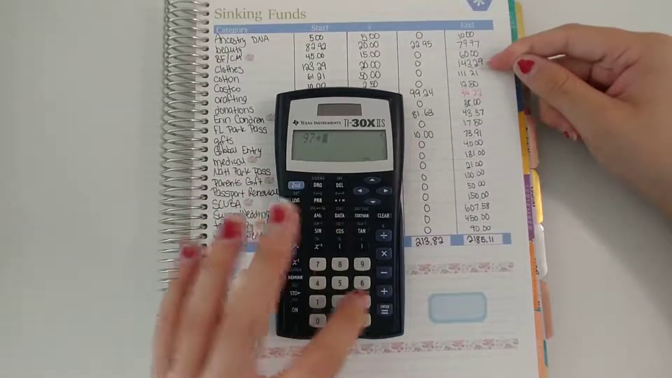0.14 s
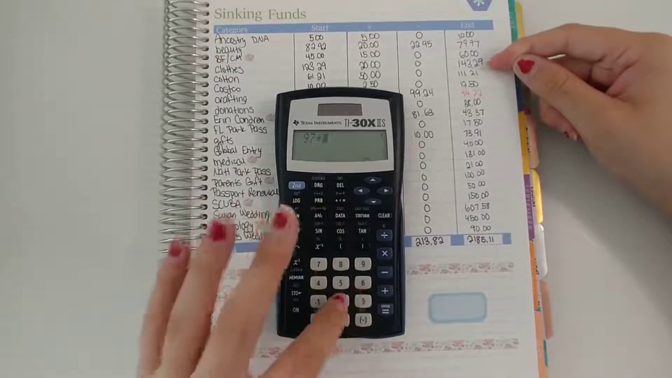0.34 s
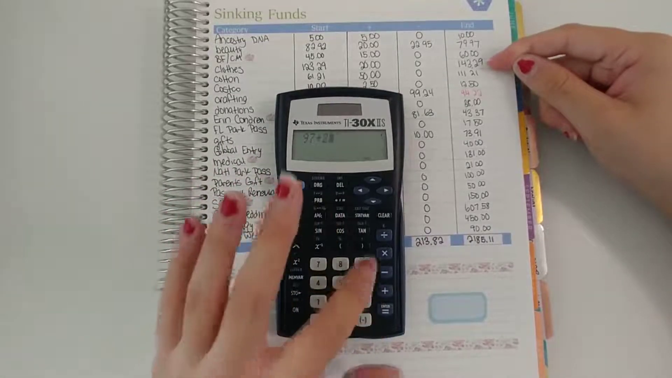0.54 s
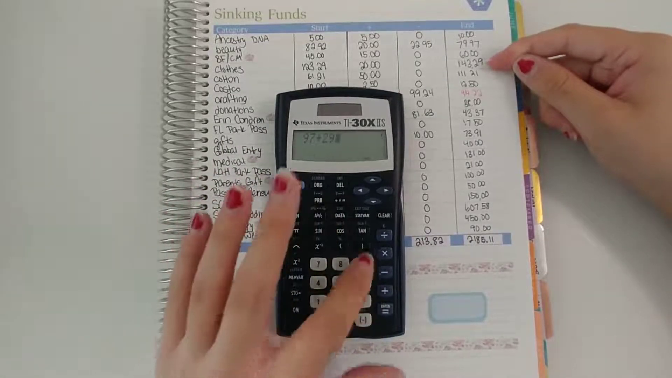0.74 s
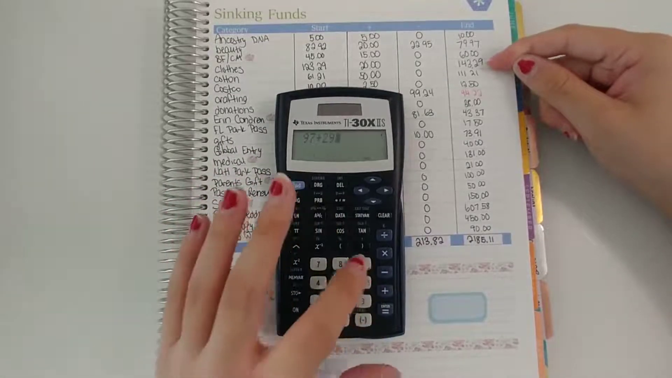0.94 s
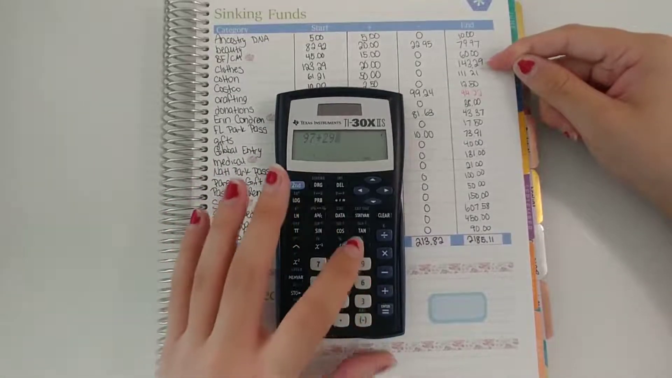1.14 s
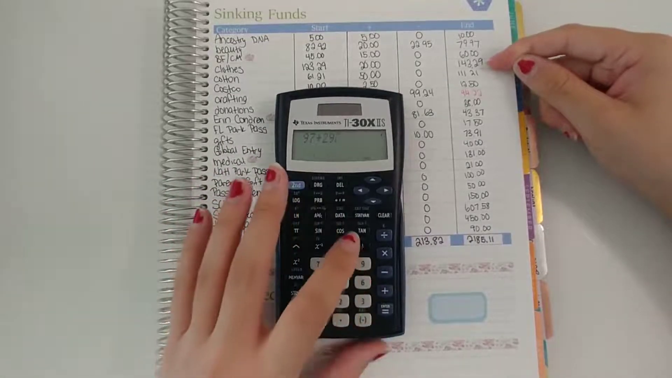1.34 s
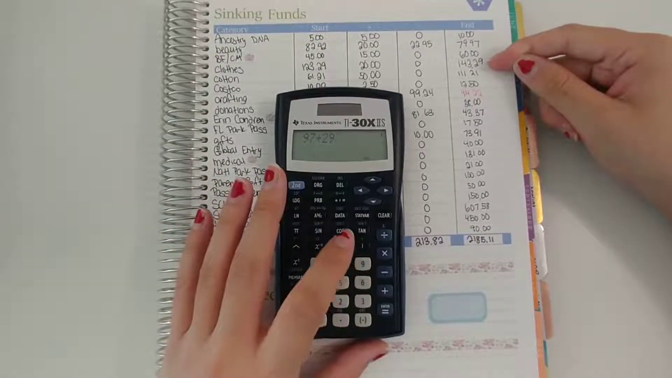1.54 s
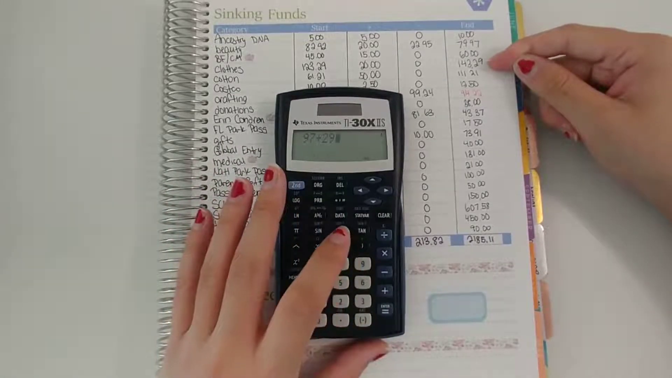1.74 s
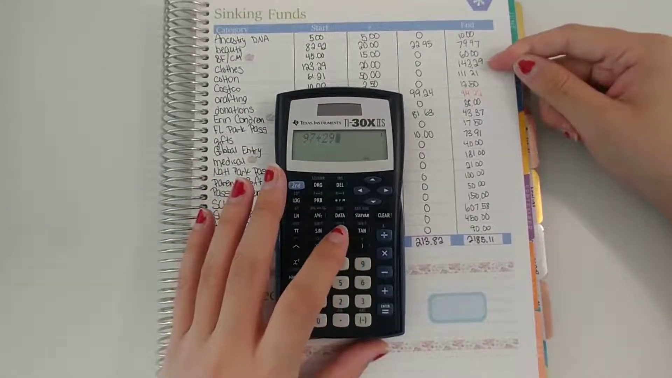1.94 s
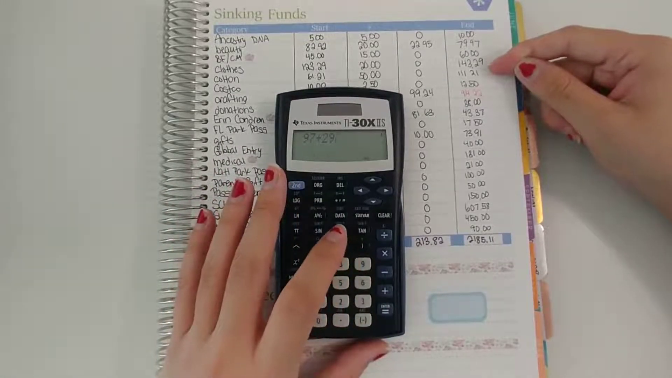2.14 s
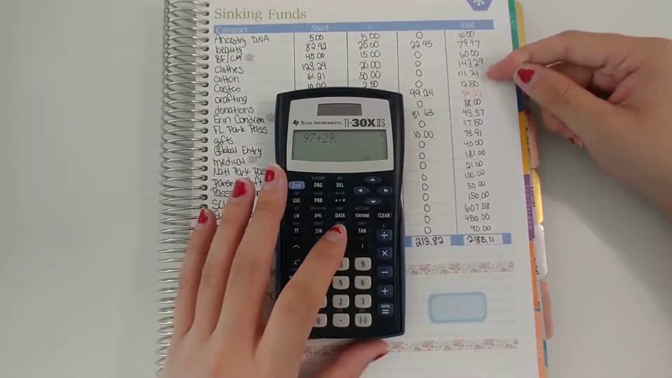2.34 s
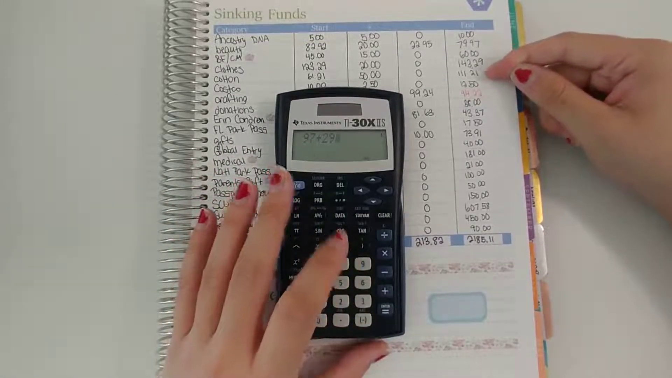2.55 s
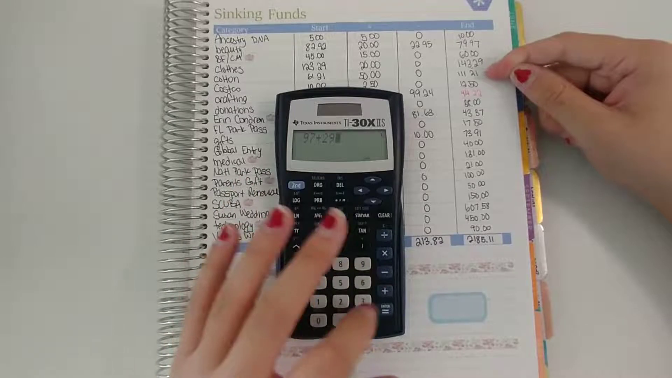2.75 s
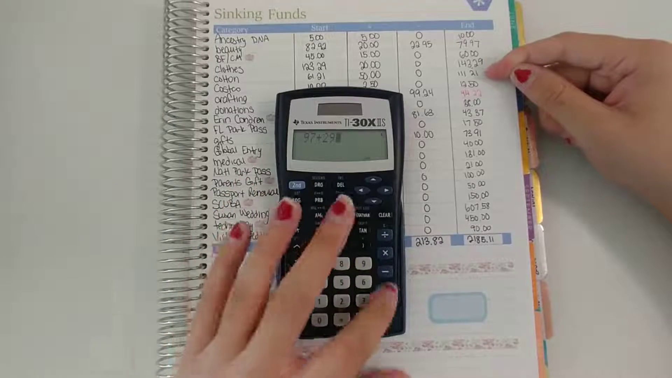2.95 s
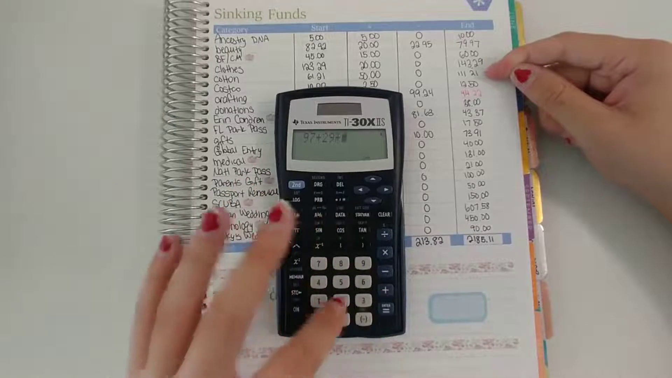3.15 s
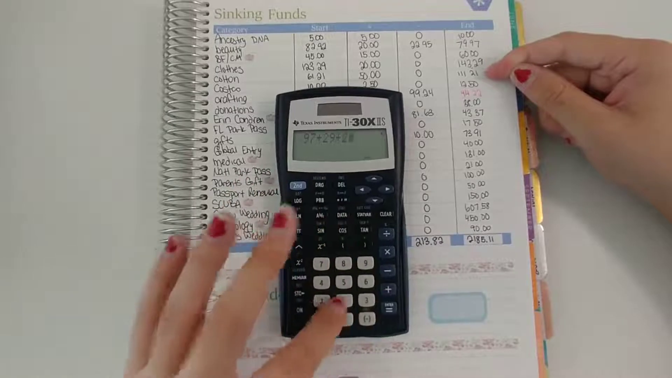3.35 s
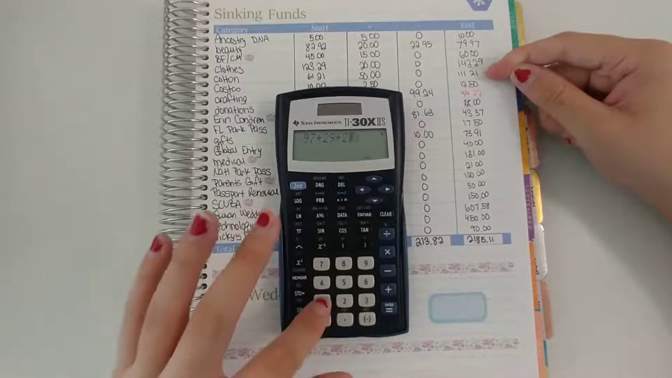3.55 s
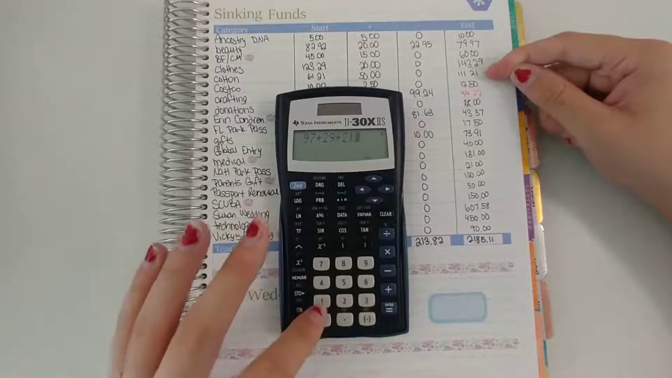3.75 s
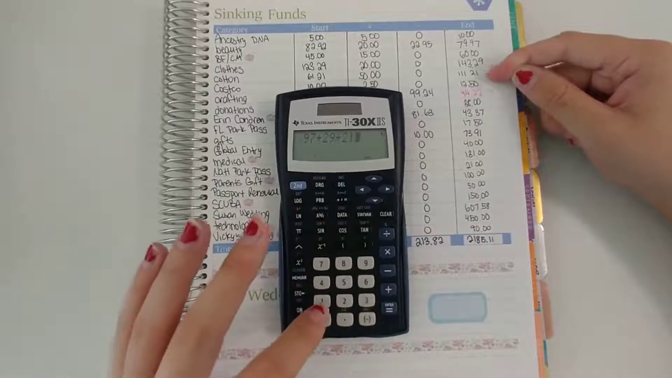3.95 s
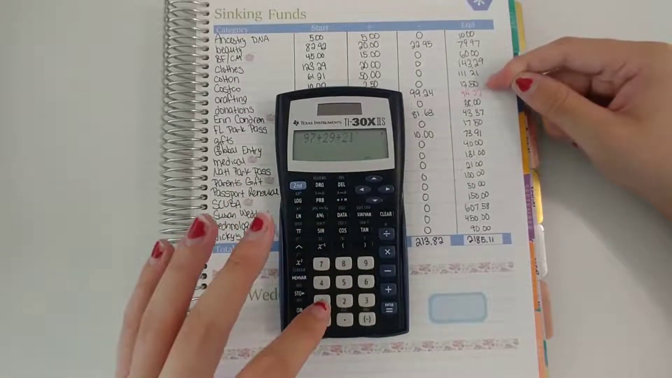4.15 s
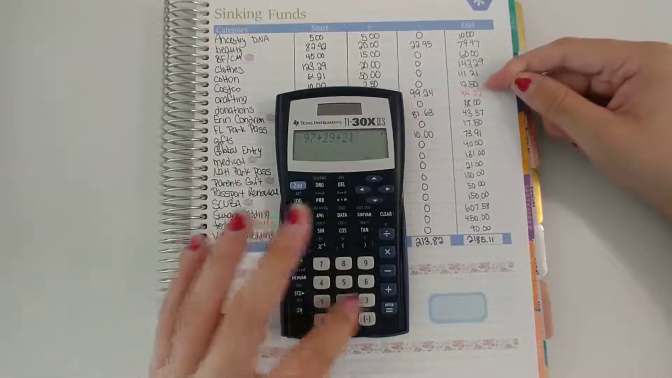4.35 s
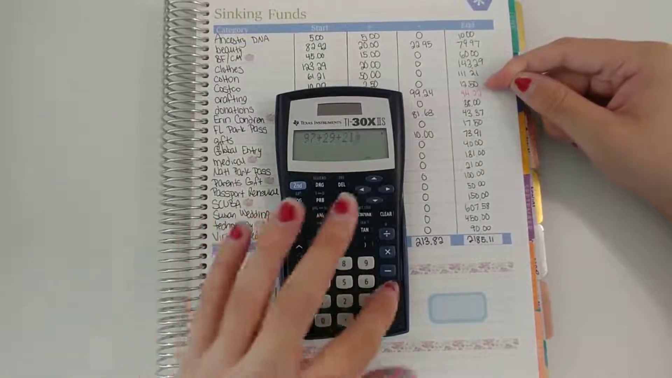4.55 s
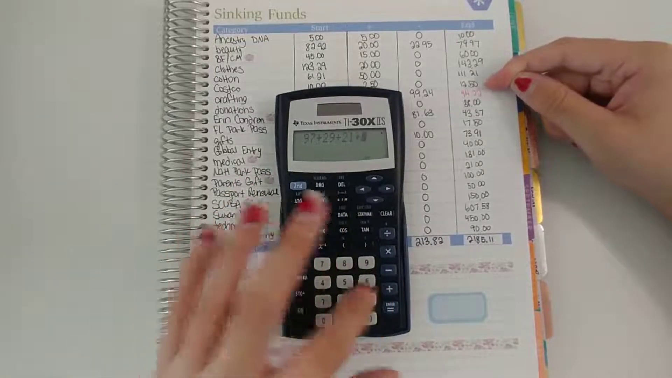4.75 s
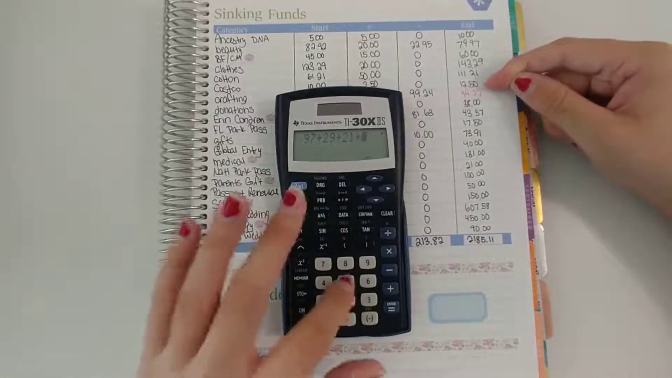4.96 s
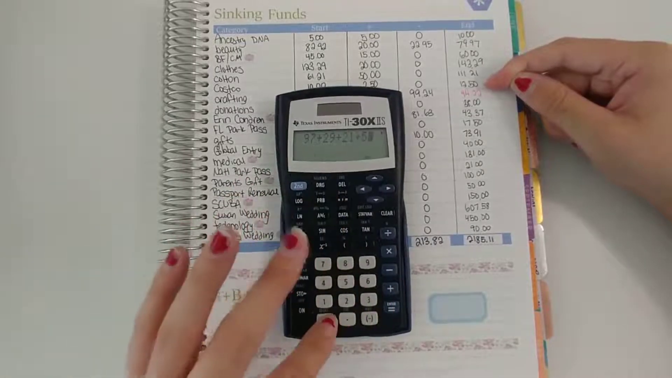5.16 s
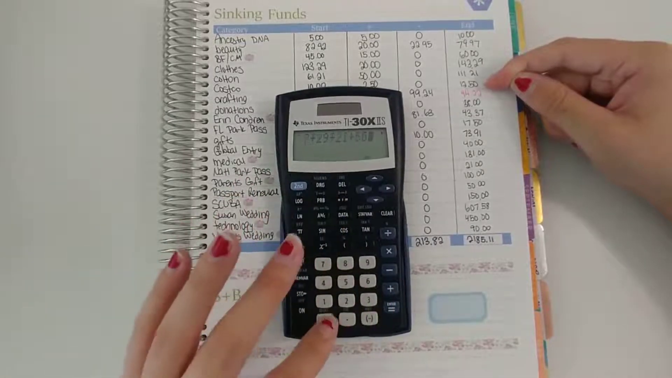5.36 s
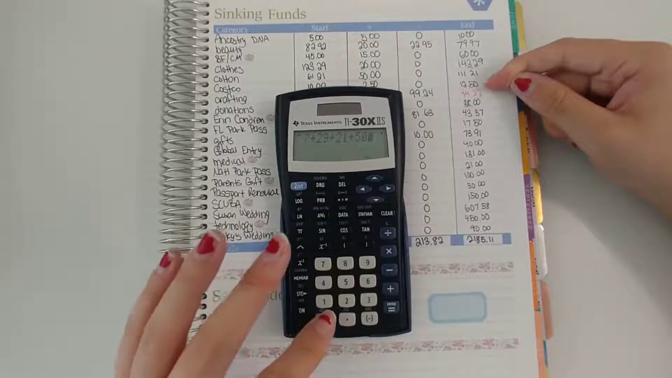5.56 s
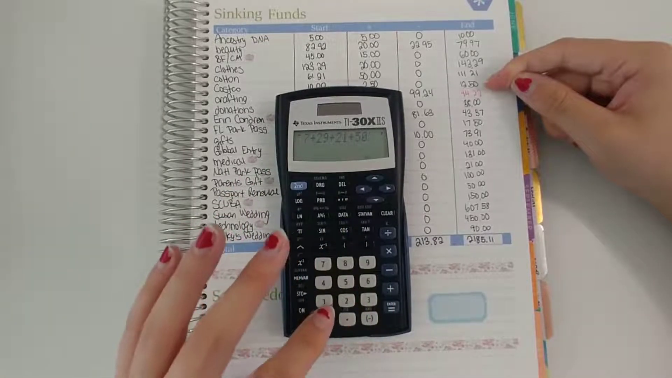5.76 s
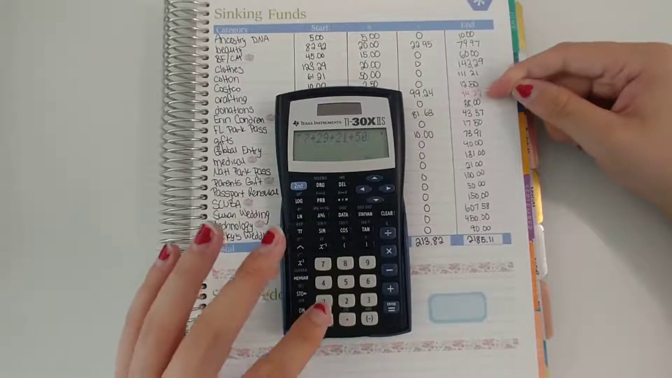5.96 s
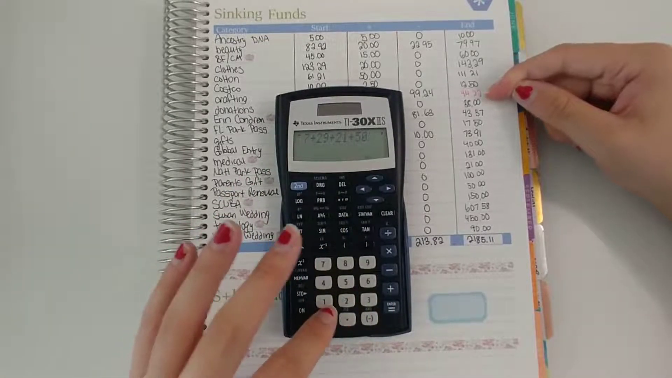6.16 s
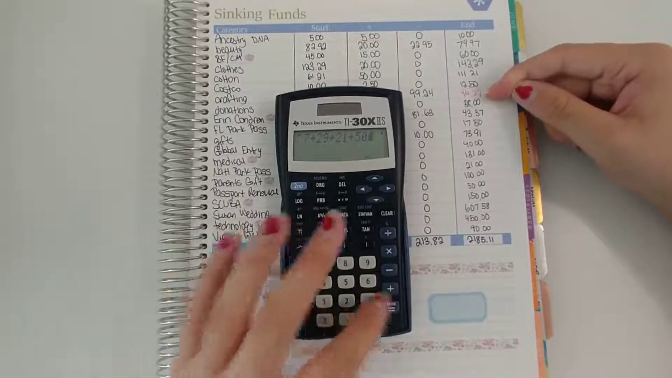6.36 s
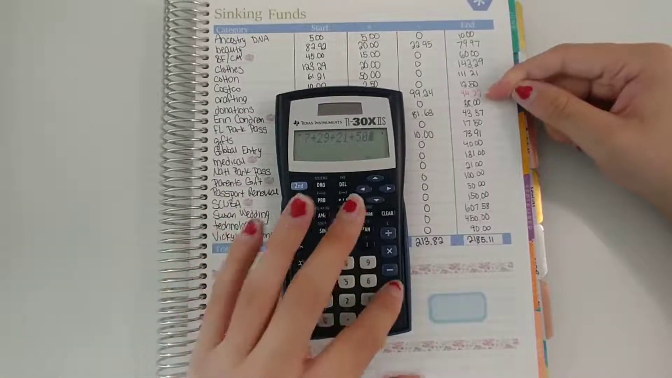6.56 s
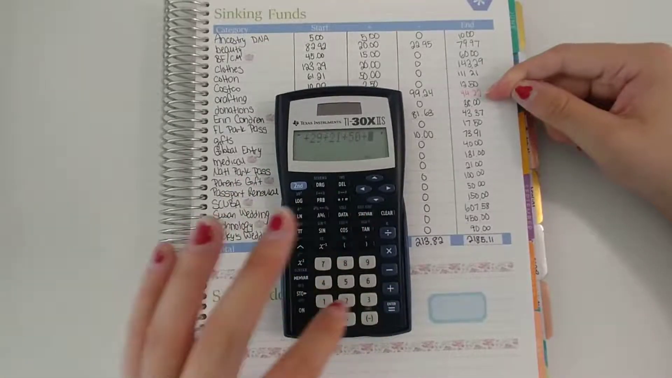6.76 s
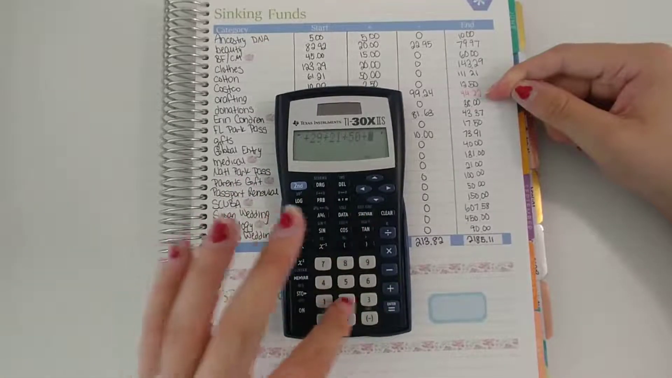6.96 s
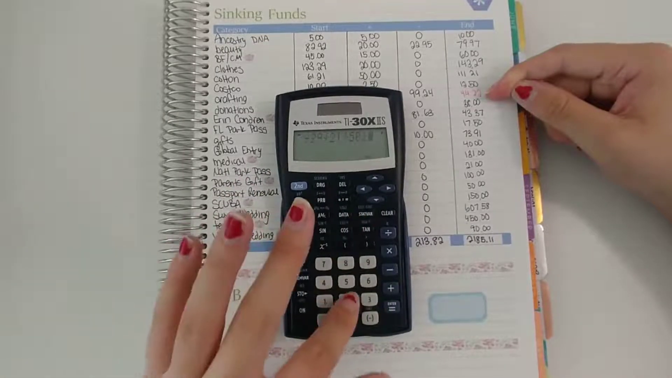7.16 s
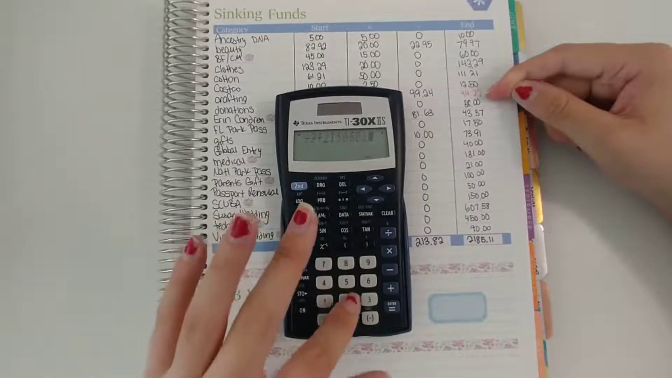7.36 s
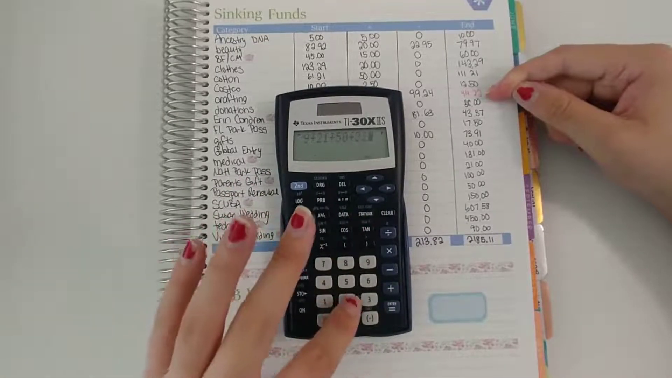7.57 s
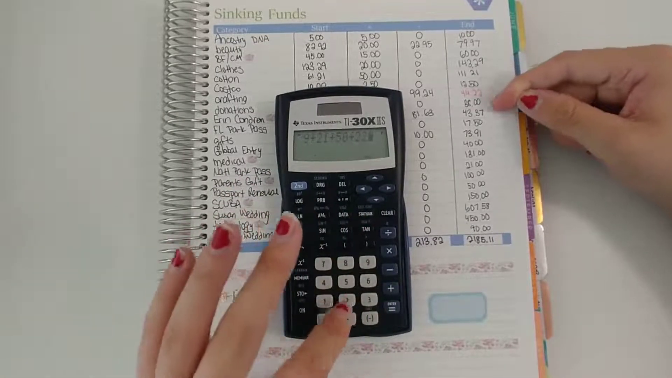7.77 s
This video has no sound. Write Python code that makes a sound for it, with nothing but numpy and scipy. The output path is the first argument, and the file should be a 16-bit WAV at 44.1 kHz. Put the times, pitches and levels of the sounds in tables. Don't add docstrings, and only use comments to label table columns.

```python
import sys
import numpy as np
from scipy import signal
from scipy.fft import rfft, irfft, next_fast_len
from scipy.io import wavfile
from scipy.ndimage import uniform_filter1d, map_coordinates

SR = 44100
rng = np.random.default_rng(int(sys.argv[2]) if len(sys.argv) > 2 else 0)


def volts(x):
    e = np.asarray(x, float) / 20
    return 10 ** e


def unload_wav(signal):
    wavfile.write(
        sys.argv[1],
        SR,
        np.round(np.clip(np.atleast_2d(signal).T, -1, 1) * 32767).astype(np.int16),
    )


N = 345303


def unit(x):
    return x / np.sqrt(np.mean(x ** 2) + 1e-20)


def along(points, hz):
    f, v = np.transpose(points)
    return np.interp(np.log(hz + 1), np.log(f + 1), v)


def wobble(rate_hz):
    knots = rng.standard_normal(int(N * rate_hz / SR) + 4)
    return map_coordinates(knots, [np.arange(N) * rate_hz / SR])


def swells(rows):
    t = np.arange(N) / SR
    total = 0
    for s, db, rise_s, fall_s in rows:
        decay = np.where(t < s, (s - t) / rise_s, (t - s) / fall_s)
        total = total + volts(db - 20 * decay)
    return total


def filtered(x, response):
    m = next_fast_len(N + SR // 2, real=True)
    return irfft(rfft(x, m) * response(np.fft.rfftfreq(m, 1 / SR)), m)[..., :N]


def causal(db):
    cepstrum = irfft(np.log(volts(db)))
    half = len(cepstrum) // 2
    folded = np.r_[cepstrum[0], 2 * cepstrum[1:half], np.zeros(len(cepstrum) - half)]
    return np.exp(rfft(folded))[:len(db)]


def modes(table):
    def response(f):
        total = 0
        for k, (c, w, db) in enumerate(table):
            total = total + (-1) ** k * volts(db) * 1j * f * w / (c * c - f * f + 1j * f * w)
        return total
    return response


def favoured(table, hz):
    lift_db, reach_hz = 6.5, 500
    return [(c, w, db + lift_db * np.exp(-((c - hz) / reach_hz) ** 2)) for c, w, db in table]


def rings(parts, gains_db):
    span = SR // 8
    half = span // 2
    hz = np.fft.rfftfreq(span, 1 / SR)
    ring = np.array([irfft(modes(part)(hz), span)[:half] for part in parts])
    return volts(gains_db)[:, None] * ring * np.hanning(span)[half:half * 2]


# freq_hz, correlation
ALIKE = [(60, 0.92), (240, 0.73), (950, 0.14), (3770, 0.022), (15000, -0.42)]
# freq_hz, lean_db
LEAN = [(60, 6.5), (240, 2), (950, 3.5), (3770, 4.5), (15000, 1.5)]


def rush(response, patchy_db):
    z = signal.stft(rng.standard_normal((2, N)), nperseg=512)[2]
    field = uniform_filter1d(rng.standard_normal(z.shape[1:]), 6, 0)
    field = uniform_filter1d(field, 10, 1)
    patchy = signal.istft(z * volts(patchy_db * unit(field)), nperseg=512)[1][:, :N]
    m = next_fast_len(N + SR // 2, real=True)
    hz = np.fft.rfftfreq(m, 1 / SR)
    a, b = rfft(patchy, m) * response(hz)
    turn = np.arccos(np.clip(along(ALIKE, hz), -1, 1)) / 2
    lean = volts(along(LEAN, hz) / 2)
    mid, side = a * np.cos(turn), b * np.sin(turn)
    return unit(irfft(np.array([(mid + side) * lean, (mid - side) / lean]), m)[:, :N])


# freq_hz, t60_s
ROOM = [(250, 0.37), (700, 0.42), (2000, 0.42), (5000, 0.31), (8000, 0.31), (12000, 0.18)]
# delay_s, level_db
WALLS = [(.005, -17), (.010, -19.5), (.013, -15), (.017, -24), (.022, -22.5), (0.03, -29.5)]


def answer(walls_db, tail_db):
    hz, t, z = signal.stft(rng.standard_normal((2, SR // 3)), SR, nperseg=256)
    alike = np.clip(along(ALIKE, hz), 0, 1)[:, None]
    z = np.array([z[0], alike * z[0] + np.sqrt(1 - alike ** 2) * z[1]])
    tail = signal.istft(z * volts(-60 * t / along(ROOM, hz)[:, None]), SR, nperseg=256)[1]
    t = np.arange(tail.shape[1]) / SR
    tail = volts(tail_db) * tail / np.linalg.norm(tail[0]) * (1 - np.exp(-t / 0.0015))
    early = 0
    for s, db in WALLS:
        early = early + volts(db + walls_db) * (t > s) * np.exp(-np.abs(t - s) / 0.0017) / 8
    return tail + early * rng.standard_normal(tail.shape)


def contacts(blows, shared, lean_db, strike, t60_s, lag_s, walls_db, tail_db):
    blur_s = 0.0083
    t = np.arange(SR // 50) / SR
    chatter = volts(-60 * t / t60_s) + 0.2 * volts(-60 * t / 0.049)
    shared = np.clip(shared, 0, 1)[:, None, None]
    facing = volts(np.outer(lean_db, [.5, -.5]))[..., None]
    out = np.zeros((2, N + SR))
    for s, ring, pan_db in blows:
        scrape = chatter * rng.standard_normal((2, len(t)))
        scrape[:, 0] = strike
        scrape = scrape / np.linalg.norm(scrape, axis=1, keepdims=True)
        drive = shared * scrape[0] + (1 - shared) * scrape
        direct = (signal.fftconvolve(ring[:, None], drive, axes=2) * facing).sum(axis=0)
        direct[0] = np.roll(direct[0], round(lag_s * SR))
        direct = direct * volts(np.array([[pan_db], [-pan_db]]) / 2)
        whole = ring.sum(axis=0)
        merged = whole * volts(-60 * np.arange(len(whole)) / SR / blur_s)
        merged = merged * np.linalg.norm(whole) / np.linalg.norm(merged)
        echo = signal.fftconvolve(merged[None], answer(walls_db, tail_db), axes=1)
        echo = echo * volts(np.array([[1.5], [-1.5]]))
        start = round((s + .0004) * SR)
        out[:, start:start + direct.shape[1]] += direct
        out[:, start:start + echo.shape[1]] += echo
    return out[:, :N]


# time_s, level_db
BUILDING = [(0.0, -61.5), (0.74, -62), (1.18, -65), (2.3, -61), (3.5, -61), (4.2, -62.5), (5.2, -59),
            (5.65, -63.5), (6.6, -58), (6.8, -61), (7.4, -58.5), (7.83, -57.5)]
# peak_s, level_db
SHAKES = [
    (2.44, -55),
    (2.79, -54),
    (2.97, -53),
]
# freq_hz, density_db
RUMBLE = [(15, -59), (25, -38.5), (40, -16), (65, -3), (124, -4), (144, -10), (172, -1.5), (199, -20),
          (400, -18.5), (520, -33), (880, -120)]
# freq_hz, density_db
HISS = [(120, -36.5), (200, -1), (284, -11), (617, -12), (1200, -20.5), (2210, -26.5), (2960, -26),
        (3560, -27), (4370, -29.5), (7460, -34), (10000, -37.5), (15000, -32.5), (16500, -43.5)]
# center_hz, width_hz, level_db
FAN = [(2220, 120, -1), (3640, 98, 1), (5770, 200, -12.5), (7540, 260, -12)]
# peak_s, level_db
WHISTLES = [
    (0.94, -70),
    (2.9, -67),
    (3.79, -71.5),
    (6.391, -77),
]


def air():
    building = volts(np.interp(np.arange(N) / SR, *np.transpose(BUILDING), -120, -120))
    shake = building + swells([(s, db, 0.057, 0.15) for s, db in SHAKES])
    rumble = shake * volts(0.7 * wobble(10.0)) * rush(lambda hz: volts(along(RUMBLE, hz)), patchy_db=0.5)
    follow = (shake / volts(-60.5)) ** 0.42
    murmur = follow * volts(-66.0) * rush(lambda hz: volts(along(HISS, hz)), patchy_db=0.5)
    fan = volts(-76.5 + 0.56 * wobble(9.7)) * rush(modes(FAN), patchy_db=3.5)
    whistle = volts(-87.5) + swells([(s, db, 0.27, 0.56) for s, db in WHISTLES])
    whistle = whistle * volts(-6.5) * rush(modes([(1564, 120, 0)]), patchy_db=1.5)
    return rumble + murmur + fan + whistle


# start_s, peak_db, pitch_hz
THUMPS = [(0.001, -47, 55.9), (0.322, -49.5, 66.6), (0.645, -45.5, 70), (0.739, -51, 99),
          (1.846, -56, 67.7), (2.41, -55.5, 76.1), (2.446, -44.5, 92.86), (2.742, -53, 74.6),
          (2.806, -57.5, 95.8), (2.946, -31.5, 72), (2.987, -46.5, 56), (3.295, -46.5, 67.7),
          (3.527, -48.5, 70.7), (3.654, -53.5, 71), (4.6016, -35.5, 79.5), (4.643, -44, 78),
          (4.9624, -37.5, 75.7), (5.164, -49, 83.23), (5.211, -47, 99), (5.255, -43.5, 75),
          (5.442, -48, 84.6), (6.536, -43, 96.5), (7.095, -47.5, 72.5), (7.214, -51, 68.8),
          (7.364, -48, 66.8)]


def thumps():
    out, t = np.zeros(N + SR), np.arange(SR // 3) / SR
    swell = (t / 0.0074) ** 2 * np.exp(-t / 0.0067)
    swell = swell + 0.14 * (1 - np.exp(-t / 0.022)) * volts(-60 * t / 0.098)
    neighbours = 0.28 * np.sin(2 * np.pi * 113 * t) + 0.22 * np.sin(2 * np.pi * 57 * t)
    for s, db, hz in THUMPS:
        ring = np.sin(2 * np.pi * hz * t) + neighbours
        out[round(s * SR):][:len(t)] -= volts(db + 5.5) * swell * ring
    return out[:N] * volts(np.array([[2.5], [-2.5]]))


# center_hz, width_hz, level_db
KEY = [(3264, 680, -8), (3700, 610, -3), (4326, 340, -3.5), (4680, 300, -2.5), (5130, 460, -4),
       (5720, 150, -0.5)]
CASE = [(925, 400, -14), (1540, 200, 2), (2210, 1450, -5.5), (2510, 133, 1.5)]
CAP = [(6190, 430, 4.8), (7200, 810, 4.7), (7430, 206, 8.5), (8090, 330, 3.4)]
SNAP = [(12700, 1500, 11), (13600, 350, 1), (15200, 480, 31)]
# start_s, peak_db, case_db, cap_db, mode_hz
DOWNS = [(0.0516, -50.5, -7, -9, 4770), (0.315, -33, -12, -5.5, 6780), (0.6348, -32, -27, -23, 5790),
         (3.271, -35, -18, -12.5, 3360), (3.4891, -60, 7, -13, 3070), (3.496, -50, 3, -9, 6540),
         (4.5978, -37, -10, -16.5, 4200), (4.9487, -36, -22, -29, 3260), (5.1984, -35.5, -12.5, -9.5, 5580),
         (6.5319, -39.5, -14, -9, 7600), (7.436, -38.5, -11.5, -14.5, 3850)]
# start_s, peak_db, case_db, cap_db, snap_db
UPS = [
    (0.407, -33.5, -11, -3.5, -33),
    (0.7303, -23.5, -16.5, -12, -18.5),
    (3.3695, -31.5, -11.5, -9, -32),
    (3.6403, -37.5, -10.5, -7, -27.5),
    (4.686, -32, -22, -9.5, -28),
    (5.036, -35.5, -13, -17, -26),
    (5.3413, -25, -19.5, -9, -34),
    (6.615, -26, -22, -8.5, -31),
    (7.2038, -29, -11.5, -7.5, -26),
]
UP_MODES_HZ = [3700, 4880, 6520, 3750, 5940, 4770, 5600, 4900, 7590]
# start_s, peak_db, case_db, mode_hz
BOUNCES = [(0.6401, -37.5, -8.5, 5830), (0.6488, -35.5, -10, 4300), (0.7377, -30, -10, 3700),
           (3.3825, -42, -38, 6167), (3.644, -37.5, -13.5, 4300), (4.694, -33.5, -17.5, 5820),
           (4.9573, -46.5, -5, 3520), (5.3602, -44, -19, 5555), (6.537, -43, -3, 6030),
           (6.6224, -34.5, -9.5, 4730), (7.2167, -46, -12, 5760)]
# start_s, peak_db
TICKS = [(0.0699, -63), (0.3294, -54), (0.4195, -56), (0.6288, -52), (2.034, -59.5), (4.5823, -52),
         (4.704, -50), (5.181, -48.5), (5.194, -52), (6.604, -51), (7.068, -58), (7.3251, -55.5),
         (7.3294, -53.5)]


def keys():
    # start_s, peak_db, case_db, cap_db, snap_db, mode_hz
    rows = [(s, db, case_db, cap_db, -30, hz) for s, db, case_db, cap_db, hz in DOWNS]
    rows += [(*row, hz) for row, hz in zip(UPS, UP_MODES_HZ)]
    rows += [(s, db, case_db, -10.5, -24.5, hz) for s, db, case_db, hz in BOUNCES]
    rows += [(s, db, -6.5, -10, -26, 3700) for s, db in TICKS]
    blows = []
    for s, db, case_db, cap_db, snap_db, hz in sorted(rows):
        parts = (favoured(KEY, hz), CASE, favoured(CAP, hz), SNAP)
        gains_db = db + np.array([14, case_db + 25.5, cap_db + 15.5, snap_db + 4.5])
        blows.append((s, rings(parts, gains_db), 7.5))
    return contacts(blows, shared=(0.15, 0.21, 0.29, .1), lean_db=(3.7, -3.5, 2.5, -1.2),
                    strike=13, t60_s=0.018, lag_s=.00012, walls_db=5.5, tail_db=-14)


# peak_s, level_db, rise_s, fall_s
SHIFTS = [(0.8, -86, .01, 3.6), (1.265, -76, .026, .042), (2.042, -77, .089, .18), (2.34, -78, .24, 1.5),
          (3.75, -92, .01, 2.8), (4.12, -77, .36, .13), (5.85, -82, .011, .6), (5.96, -71, .07, .063),
          (6.28, -89, .02, 3.5), (7.27, -70, .02, .05), (7.436, -71, .012, .23), (7.82, -72, .12, 3.4)]
# freq_hz, density_db
PAPER = [(1000, -120), (2000, 4), (5000, -1), (7500, -2.5), (9500, -18), (15000, -20), (16500, -120)]


def rustle():
    grain = volts(2.7 * wobble(150))
    return swells(SHIFTS) * grain * rush(lambda hz: volts(along(PAPER, hz)), patchy_db=3.0)


# center_hz, width_hz, level_db
BOOK = [(196, 75, 0.18), (330, 120, 0.092), (483, 155, 1), (670, 260, -3.2)]
# start_s, peak_db, edge_db
PADS = [
    (1.414, -59.5, -24),
    (3.496, -53, -6),
    (3.514, -55, -25),
    (3.529, -60, -20),
    (5.201, -46, -8),
    (5.209, -61, -20),
    (5.217, -50, -16),
    (7.261, -64, -9),
]


def pads():
    blows = [(s, rings((BOOK, CASE), db + np.array([32, edge_db + 9.0])), 5) for s, db, edge_db in PADS]
    return contacts(blows, shared=(.8, .4), lean_db=(0, 0),
                    strike=2.1, t60_s=0.045, lag_s=.0001, walls_db=7, tail_db=-10.5)


# center_hz, width_hz, level_db
FLAT_BODY = [(1150, 42, -10.5), (1340, 74, -1.5), (1600, 55, -9.5), (1760, 160, -5.5), (2074, 75, 2),
             (2390, 60, 3.5), (2490, 120, -13)]
FLAT_HOLLOW = [(269, 29, 0.5), (360.6, 110, -9.5), (451, 70, 5.5), (615, 47, 0.5), (767, 57, 1),
               (963, 50, 1.5)]
SLAP = [(4730, 460, 3), (5878, 600, -2.5), (7380, 420, 3.5), (10115, 4400, -2), (12500, 1500, 0.5),
        (14790, 1600, -9.5)]
# center_hz, width_hz, level_db
BODY = [(1151, 44, -8.5), (1390, 92, -2), (1500, 70, -9), (1620, 70, -3.5), (1846, 91, -9), (2060, 61, 3),
        (2335, 84, -4.5), (2550, 300, -13.5)]
HOLLOW = [(198.4, 140, -6.5), (287.2, 160, -5), (447, 43, 4.5), (650, 29.8, 5), (764, 27, -5),
          (962, 110, -0.5)]
CRACK = [(4854, 725, -1), (5530, 710, 5.5), (6575, 970, 0), (7650, 240, 6.5), (9639, 1430, -6),
         (11630, 5200, -9.5), (15380, 1003, -9.5)]
# center_hz, width_hz, level_db
RIM = [(3120, 450, 6.5), (3680, 520, 4), (4300, 720, -6)]
# start_s, peak_db, hollow_db, rim_db, slap_db
LANDING = [
    (2.4004, -9.5, -14, -14.5, -13.5),
    (2.4033, -13.5, -11, -20.5, -2),
    (2.4054, -18.5, -15, -23.5, -10),
    (2.4128, -22.5, -13, -13.5, -5.5),
    (2.4178, -17, -14, -8, -8),
    (2.4228, -17.5, -11, -18.5, -13),
    (2.4405, -29, -12, -19.5, -12),
    (2.467, -26, -12, -25.5, -22),
]
# start_s, peak_db, hollow_db, rim_db, crack_db
TUMBLE = [(2.7326, -21.5, -9, 3, 9), (2.7436, -20, -10.5, -12, 1), (2.8025, -15.5, -10.5, -7.5, -8.5),
          (2.9284, -40, -31.5, -3, 1), (2.9342, -22.5, -21.5, -2, -4.5), (2.9398, -27, -9.5, -0.5, 1.5),
          (2.9454, -41, 3, -10, -4), (2.9724, -26.5, -8, -20, -24), (2.9795, -39, 1, -19, -12),
          (3.0158, -41, -9, -17, 9.5), (3.021, -33.5, -24, -9, 4.5), (3.0403, -35.5, -7, -2, -3),
          (3.0552, -49, 8.5, -12, -22.5), (3.0894, -58, 13, -18, -21), (3.1104, -68, 9.5, -16, -17)]


def knocks():
    land_pan_db, roll_db_per_s = 1, 9.5
    land_s = min(LANDING)[0]
    blows = []
    for rows, body, hollow, edge in ((LANDING, FLAT_BODY, FLAT_HOLLOW, SLAP), (TUMBLE, BODY, HOLLOW, CRACK)):
        for s, db, hollow_db, rim_db, edge_db in rows:
            gains_db = db + np.array([25, hollow_db + 31, rim_db + 16.0, edge_db + 11.0])
            pan_db = land_pan_db + roll_db_per_s * (s - land_s)
            blows.append((s, rings((body, hollow, RIM, edge), gains_db), pan_db))
    return contacts(blows, shared=(0.49, 0.71, 0.2, 0.062), lean_db=(-0.5, 1.5, 4.0, -1.5),
                    strike=7.3, t60_s=0.013, lag_s=.00017, walls_db=-2, tail_db=-10.5)


# freq_hz, gain_db
PORTS = [(20, 10), (8800, 6), (9800, -3), (10600, -11.5), (12000, -5), (13500, -0.5), (20000, 2.5)]


def scene():
    hits = filtered(keys() + pads() + knocks(), lambda hz: causal(along(PORTS, hz)))
    return air() + thumps() + hits + rustle()


def low_pass(x):
    return signal.sosfilt(signal.butter(12, 16830, fs=SR, output="sos"), x)


# freq_hz, gain_db
BAND = [(10, -57.5), (30, -5.5), (40, -16.5), (48, 1.5), (15700, 2.5), (16000, -24.5), (16800, -32),
        (17200, -71.5)]


def record(dry):
    mix = filtered(dry, lambda hz: volts(along(BAND, hz)))
    return low_pass(mix)


dry = scene()
out = record(dry)
unload_wav(out)
```